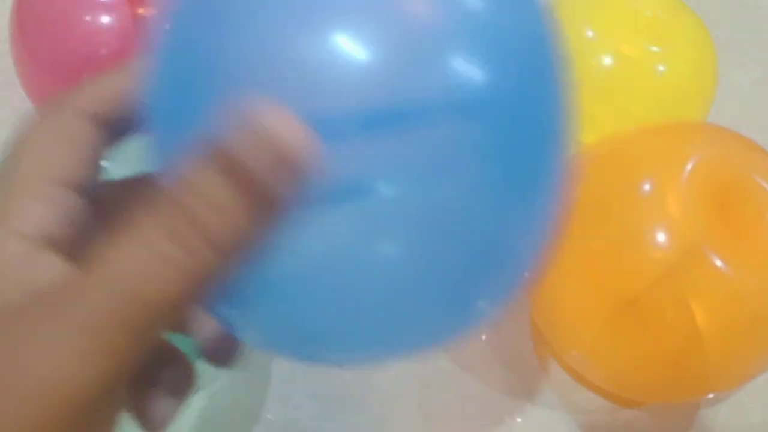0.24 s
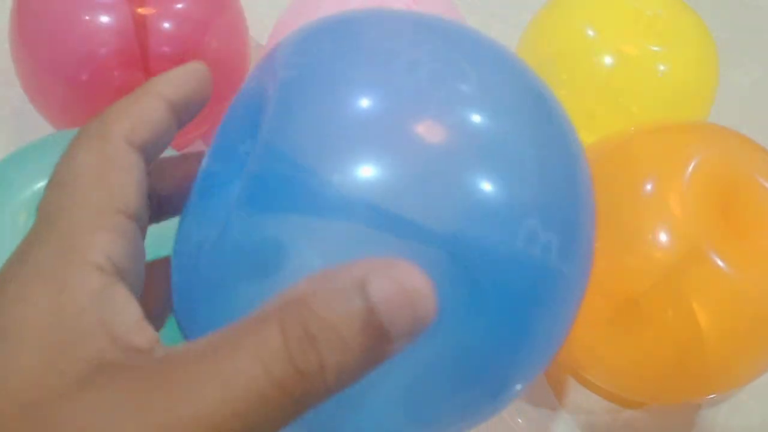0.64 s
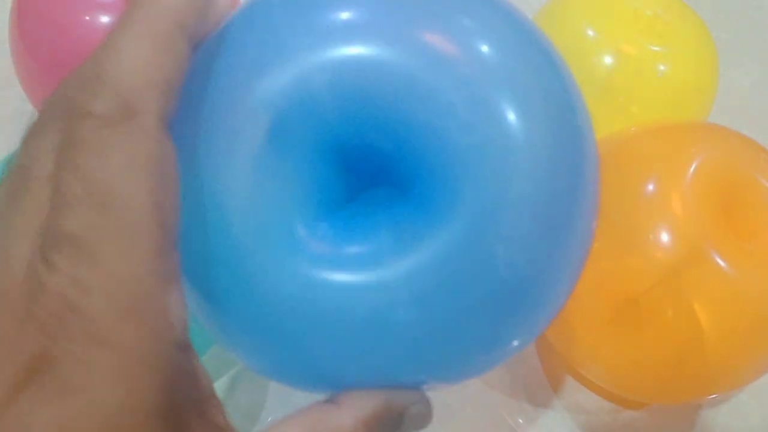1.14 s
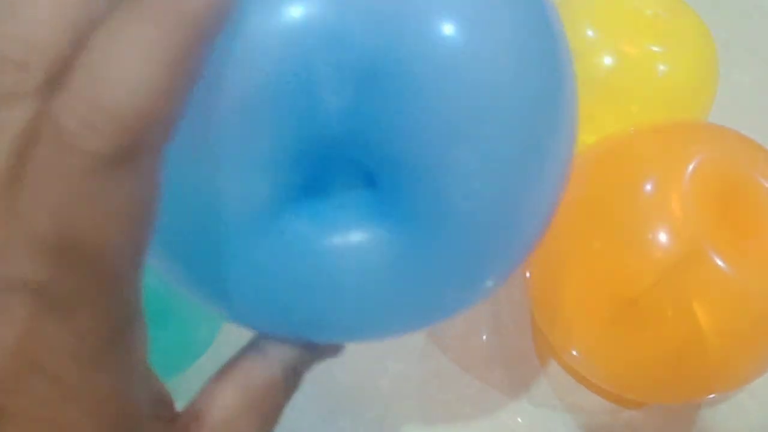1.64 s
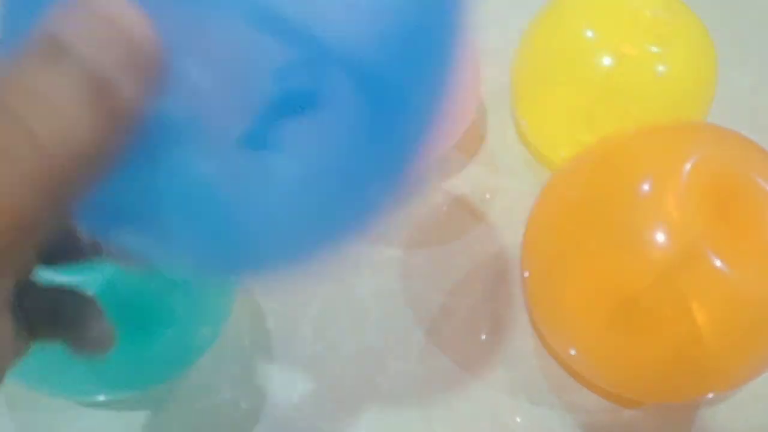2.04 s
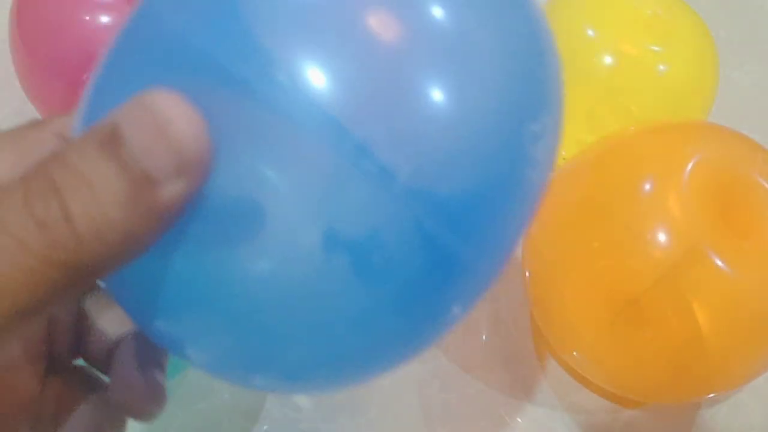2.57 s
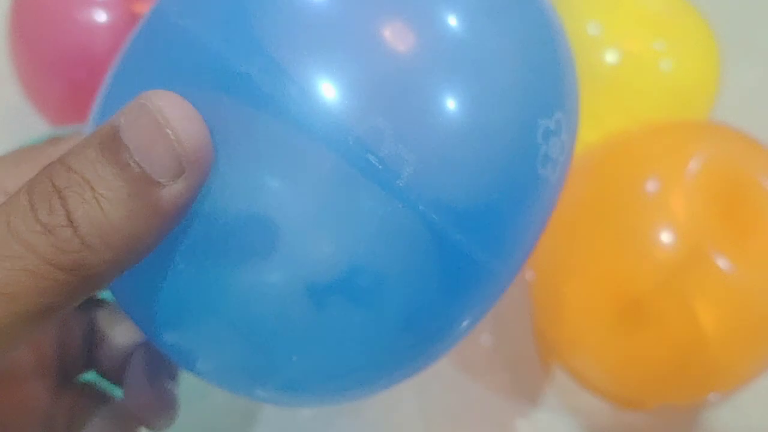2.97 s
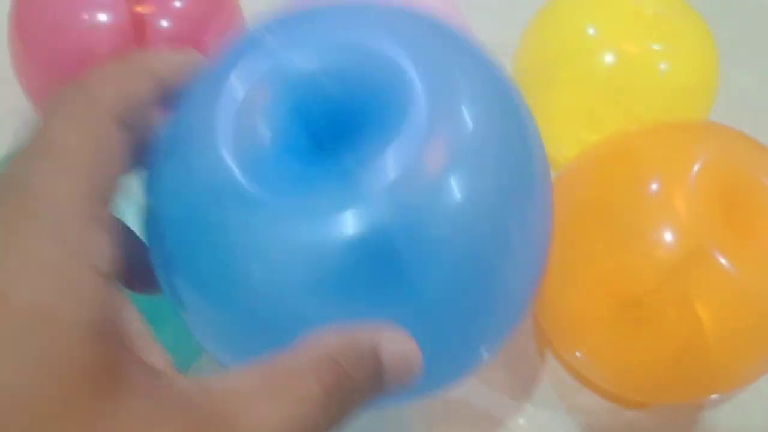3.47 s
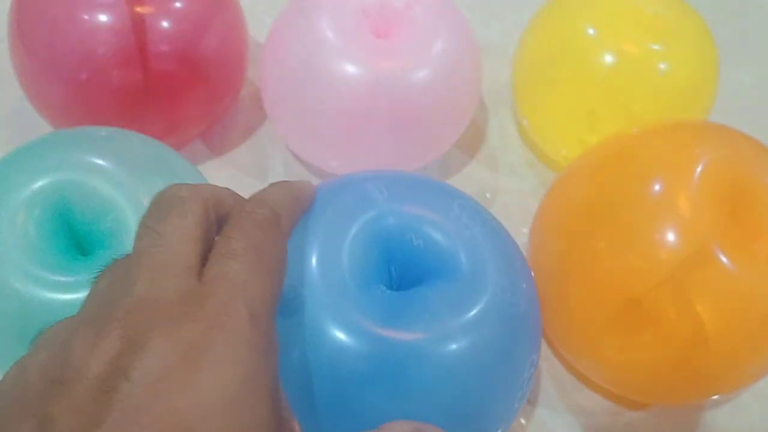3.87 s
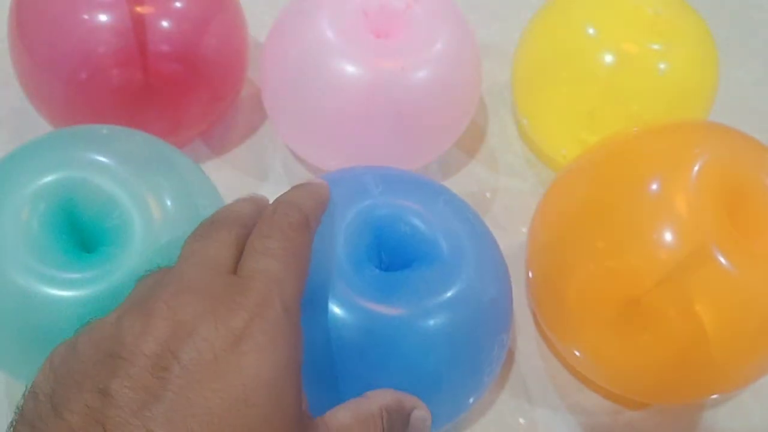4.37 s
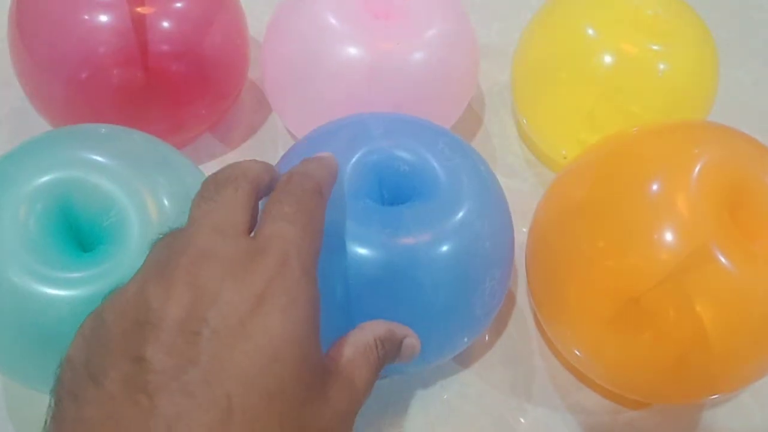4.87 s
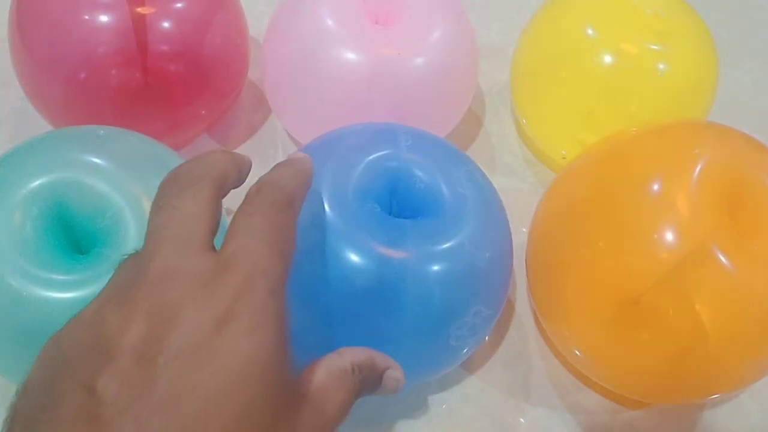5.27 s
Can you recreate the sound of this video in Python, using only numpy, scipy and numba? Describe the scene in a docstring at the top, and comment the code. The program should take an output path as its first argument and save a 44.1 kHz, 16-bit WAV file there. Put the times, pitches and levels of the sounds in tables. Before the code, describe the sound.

A hand turns and squeezes an inflated rubber balloon, with hollow ringing taps, soft rubbing and short creaks in a small room.

```python
"""In a small, hard-walled room, a hand turns and squeezes a blown-up rubber balloon close by,
then presses it down on a table among others. Fingertips pat the tight skin, fingers slide with
a soft rustle, and the rubber grips and slips in short creaks. Every touch makes the skin and
the air inside ring. The room adds a faint echo and a quiet hum."""
import sys
import numpy as np
from scipy import signal
from scipy.fft import rfft, irfft, next_fast_len
from scipy.io import wavfile
from numba import njit

SR = 44100
rng = np.random.default_rng(int(sys.argv[2]) if len(sys.argv) > 2 else 0)


def wav_out(sig):
    """Save sig, one row per channel (or a flat mono array), as 16-bit PCM at SR to the path in sys.argv[1]."""
    wavfile.write(sys.argv[1], SR, np.round(np.clip(np.atleast_2d(sig).T, -1, 1) * 32767).astype(np.int16))


N = 242991
RING_SIZE = 8192  # samples allowed for one ring to die away
AGE = np.arange(RING_SIZE) / SR  # seconds since a kick


def undb(db):
    """Turn decibels into a number to multiply by."""
    return 10 ** (np.asarray(db) / 20)


def level(x, db, seconds):
    """Scale x so that what both ears share has an average (rms) level of db over its first seconds."""
    shared = np.atleast_2d(x).mean(0)[:int(seconds * SR)]
    return x * undb(db) / np.sqrt(np.mean(shared ** 2))


def decay(t60):
    """A fade that falls 60 dB in t60 seconds, the 'fade time'."""
    return np.exp(-np.log(1000) * AGE / t60)


def colour(x, points):
    """Make some pitches louder and others softer, along a curve of (Hz, dB) points."""
    size = next_fast_len(x.shape[-1] + RING_SIZE // 2, True) * 2
    hz, db = np.transpose(points)
    grid = np.maximum(np.arange(size // 2 + 1) * SR / size, 1)
    gain = undb(np.interp(np.log(grid), np.log(hz), db))
    cepstrum = irfft(np.log(gain))
    # fold the filter so that it never sounds before it is struck
    cepstrum[1:size // 2] *= 2
    cepstrum[size // 2 + 1:] = 0
    return irfft(rfft(x, size) * np.exp(rfft(cepstrum)), size)[..., :x.shape[-1]]


def stereo_noise(size, width):
    """Noise for two ears; more width makes them less alike."""
    mid, side = rng.standard_normal((2, size))
    return np.array([mid + width * side, mid - width * side]) / np.hypot(1, width)


def play(force, response):
    """Every kick in the force sets off its own copy of a stereo response."""
    return signal.fftconvolve(force[None], response, axes=1)[:, :len(force)]


def blend(first, second, db, seconds):
    """Mix two sounds, the second one db louder than the first."""
    return level(first, 0, seconds) + level(second, db, seconds)


def add(out, start_s, sound, pan_db):
    """Mix a sound into out, with the left ear pan_db louder than the right."""
    start = max(int(start_s * SR), 0)
    sound = sound[:, :N - start]
    out[:, start:start + sound.shape[1]] += sound * undb([[pan_db / 2], [-pan_db / 2]])


# the tone of the room's background noise: (pitch [Hz], relative level [dB])
HUSH_COLOUR = [(12, -53.5), (20, -4), (60, -8.5), (130, -20.5), (459, -25), (499, -25), (923, -28),
               (2390, -32.5), (2600, -31), (3950, -37.5), (4810, -42.5), (5230, -36), (16000, -45.5)]
# steady humming notes: (pitch [Hz], level [dB])
HUM_NOTES = [(495, -85.5), (1558, -90.5)]
def room_hush(noise_db=-75.5):
    """A faint rumble, hiss and hum fill the room the whole time."""
    hum = sum(undb(db) * np.sin(2 * np.pi * hz * np.arange(N) / SR) for hz, db in HUM_NOTES)
    noise = colour(stereo_noise(N, 0.9), HUSH_COLOUR)
    return level(noise, noise_db, N / SR) + hum


def ringing(notes, detune, width):
    """Fading notes; the grip shifts their pitch, the spot touched their strength and direction."""
    hz, db, t60 = np.transpose(notes)
    tune, strength, lean = rng.standard_normal((3, len(hz)))
    phase = 2 * np.pi * (hz * (1 + detune * tune))[:, None] * AGE
    fade = undb(db + 2 * strength)[:, None] * decay(t60[:, None])
    lean = min(width, 1) * np.tanh(lean)[:, None]
    return np.array([(fade * np.sin(phase + ear * lean)).sum(0) for ear in (1, -1)])


def ripples(force, points, t60, direct, width):
    """Each kick is heard directly, then as ripples that criss-cross the skin and die away."""
    fade = decay(t60) ** 2
    energy = np.abs(play(force ** 2, fade[None] / fade.sum()))
    scattered = np.sqrt(energy) * stereo_noise(len(force), min(width, 1))
    return colour(direct * force + scattered, points)


# notes of the 'belly' (the skin bending broadly) and of the air inside, low and high:
# (pitch [Hz], relative level [dB], fade time [s])
BELLY_NOTES = [(182.5, -6, 0.012), (240, 6, 0.14), (284.3, 7.5, 0.13), (316.2, 1.5, 0.13),
               (444.5, -4, 0.093)]
LOW_AIR_NOTES = [(537, -4, 0.032), (624.4, -6, 0.27), (665.6, -1, 0.12), (787, -6, 0.11), (935, 1.5, 0.031),
                 (1020, -18, 0.062), (1134, -2.5, 0.1)]
HIGH_AIR_NOTES = [(1237, 6, 0.045), (1307, 4.5, 0.14), (1513, 0.5, 0.1), (1830, -6.5, 0.15),
                  (1978, 0.5, 0.11), (2175, -8, 0.16), (2390, -15, 0.068), (3060, -6, 0.053)]
# the tone of the skin's mellow ripples, bright slap and thin tick: (pitch [Hz], relative level [dB])
SKIN_COLOUR = [(200, -50), (400, -15.5), (600, 10), (1100, -3), (1500, -6), (3000, -52)]
SLAP_COLOUR = [(500, -62), (900, -4), (1300, -1), (2000, -6), (3200, -13.5), (4300, -25.5), (7000, -54.5)]
TICK_COLOUR = [(2500, -25), (4400, -14.5), (5500, -4), (7300, 0.5), (8600, -7), (10500, -22),
               (15500, -28.5)]
def balloon(force, seconds, ring_hz, ripple_db, belly_db, slap_db, tick_db,
            ring_t60, slap_t60, tick_t60, direct, low_air_db, high_air_db, detune):
    """A touch sounds four parts: the belly, the ring of the touched patch, a slap and a tick."""
    belly = play(force, ringing(BELLY_NOTES, detune=2 * detune, width=.5))
    belly = colour(belly, [(70, -14.0), (190, -6.5), (450, -4.5), (1200, -13.5)])
    patch = play(force, np.sin(2 * np.pi * ring_hz * AGE) * decay(ring_t60) * np.ones((2, 1)))
    # one patch answers every kick alike, which gives a creak its overtones
    skin = ripples(signal.unit_impulse(RING_SIZE), SKIN_COLOUR, t60=0.089, direct=0.57, width=0.099)
    ring = blend(patch, play(force, skin), ripple_db, seconds)
    low_air = play(force, ringing(LOW_AIR_NOTES, detune=detune, width=0.52))
    ring = blend(ring, low_air, low_air_db, seconds)
    ring = colour(ring, [(150, -35), (450, 4), (1200, 3.5), (4000, -10.5)])
    slap = ripples(force, SLAP_COLOUR, slap_t60, direct, width=0.68)
    high_air = play(force, ringing(HIGH_AIR_NOTES, detune=detune / 2, width=0.2))
    slap = blend(slap, high_air, high_air_db, seconds)
    tick = ripples(force, TICK_COLOUR, tick_t60, direct, width=1.0)
    parts = (belly, belly_db), (ring, 0), (slap, slap_db), (tick, tick_db)
    return sum(level(part, db, seconds) for part, db in parts)


# notes of the wobbling balloon: (pitch [times the main pitch], relative level [dB], fade time [s])
WOBBLE_NOTES = [(.5, -18.5, 0.15), (.84, -8.5, 0.23), (1, 5, 0.095), (1.5, -5, 0.024)]
def wobble(main_hz=92.6):
    """The whole balloon shakes in the hand with a low thud."""
    notes = [(multiple * main_hz, db, t60) for multiple, db, t60 in WOBBLE_NOTES]
    thud = ringing(notes, detune=.01, width=0.79)
    return colour(thud, [(25, -17), (60, 0.0), (170, 11), (600, -28)])


# fingertip pats and snaps; a heavier finger gives more wobble, a harder one more slap:
# (time [s], ring level [dB], ring pitch [Hz], wobble [dB above the ring], slap [dB above the ring])
PATS = [(0.0145, -51, 720, 3, -10), (0.0392, -46.5, 550, 8.5, -10), (0.073, -54, 650, 12, -4),
        (0.124, -45, 865, -2, -15.5), (0.1735, -49.5, 784, 6.5, -9), (0.187, -39, 548, -6, -15.5),
        (0.203, -47, 695, 5.5, -5.5), (0.2485, -41, 590, 10.5, -6.5), (0.311, -49, 586, 3, -8),
        (0.3981, -44.5, 650, 11.5, -10.5), (0.474, -47.5, 670, 14, -12.5), (0.552, -48, 870, 0, -15),
        (0.5648, -44, 715, 0, -12), (0.622, -61, 600, 14, -7), (0.6953, -44.5, 656, -6.5, -30.5),
        (0.7178, -42, 640, -12.5, -27.5), (0.8063, -44, 690, -12, -23), (0.846, -32.5, 618, -20, -26.5),
        (0.8597, -33, 653, -17.5, -30), (1.034, -43, 640, -12, -14), (1.312, -59, 696, 4, -19),
        (1.3403, -44, 576, -12.5, 2.5), (1.4709, -49.5, 756, -5.5, -12.5), (1.597, -49.5, 660, 5.5, -11),
        (1.6646, -57, 557, 8, -10.5), (1.7106, -44.5, 680, -2, -24), (2.175, -47, 540, 8, -16),
        (2.2, -51.5, 636, 3, -14), (2.2335, -54.5, 680, 17, -14), (2.2694, -48, 630, 6.5, -13.5),
        (2.303, -58, 604, 17, -16.5), (2.3733, -40.5, 620, 9, -6.5), (2.4423, -42, 800, -6.5, -10.5),
        (2.4868, -45.5, 624, 8.5, -13), (2.537, -38, 430, 7.5, -31.5), (2.5939, -43, 627, 13.5, -10.5),
        (2.6918, -47.5, 800, 3, -12), (2.74, -58, 595, 7.5, -18), (2.7656, -54.5, 630, -6, -19),
        (2.788, -62, 620, 7.5, -18), (3.1787, -73, 730, -3, 0), (3.2717, -53.5, 620, -31, -17.5),
        (3.569, -54.5, 720, -21.5, -22), (3.577, -43, 631, -25, -13.5), (4.4524, -42.5, 813, -27, -12.5),
        (4.9989, -52, 649, -15.5, -14), (5.0728, -54.5, 740, -16.5, 2)]
def pats(onset_s=.025):
    """A fingertip lands: the balloon wobbles, the skin rings and the finger skids for a moment."""
    out = np.zeros((2, N))
    kick = signal.unit_impulse(RING_SIZE)
    for start_s, ring_db, ring_hz, wobble_db, slap_db in PATS:
        ripple_db = 6 + 0.21 * wobble_db + .3 * slap_db
        belly_db = 0.5 + 0.47 * wobble_db + 0.027 * slap_db
        tick_db = -12.5 + .03 * wobble_db + 0.96 * slap_db
        pan_db = -2.6 - 0.1 * wobble_db + .01 * slap_db
        # a firm pat that shakes the whole balloon skids longer than a light snap
        skid = np.interp(wobble_db, [-12, 0], [.3, 1])
        skin = balloon(kick, onset_s, ring_hz, ripple_db, belly_db, slap_db, tick_db,
                       ring_t60=.04, slap_t60=0.081 * skid, tick_t60=.085 * skid,
                       direct=0.17 / skid, low_air_db=-18.5, high_air_db=-7.5, detune=0.018)
        thud = level(wobble(), wobble_db, onset_s)
        add(out, start_s, undb(ring_db) * (skin + thud), pan_db)
    return out


@njit
def moving_band(x, hz, width):
    """Keep only the sound near a moving pitch; width is a share of that pitch."""
    out, band, low = np.empty(len(x)), 0., 0.
    for i in range(len(x)):
        step = np.tan(np.pi * hz[i] / SR)
        passed = (band + step * (x[i] - low)) / (1 + step * (step + width))
        band = 2 * passed - band
        low += 2 * step * passed
        out[i] = width * passed
    return out


# strokes of a finger over the skin: (time [s], length [s], level [dB], ring pitch [Hz])
STROKES = [(0.053, 0.052, -50.5, 249), (0.213, 0.08, -54, 510), (0.387, 0.12, -51.5, 370.6),
           (0.656, 0.025, -48.5, 580), (0.76, 0.14, -53, 434), (0.996, 0.083, -55.5, 510),
           (1.117, 0.027, -48.5, 527), (1.206, 0.1, -70.5, 504), (1.318, 0.16, -51.5, 642),
           (1.58, 0.034, -52.5, 437), (1.687, 0.036, -51, 484), (1.75, 0.17, -72.5, 443),
           (1.94, 0.093, -49, 408), (2.16, 0.18, -69.5, 380), (2.419, 0.16, -50.5, 371),
           (2.587, 0.16, -62, 494), (3.221, 0.033, -64, 770), (3.651, 0.16, -61.5, 726),
           (4.168, 0.023, -50, 910), (4.31, 0.07, -56, 774), (4.421, 0.026, -51.5, 790),
           (4.548, 0.027, -50, 778), (4.794, 0.14, -54.5, 904), (5.054, 0.05, -59, 720),
           (5.183, 0.018, -67.5, 790)]
def strokes(rise_db_per_s=421, fall_db_per_s=268):
    """Each stroke rises, holds and fades; gives the level and the rubbed patch's pitch over time."""
    t = np.arange(N) / SR
    start_s, length, db, hz = np.transpose(STROKES)[:, :, None]
    before, after = np.maximum(start_s - t, 0), np.maximum(t - start_s - length, 0)
    power = undb(db - rise_db_per_s * before - fall_db_per_s * after) ** 2
    total = power.sum(0)
    return 10 * np.log10(total), (power * hz).sum(0) / total


# the tone of a sliding finger's hiss: (pitch [Hz], relative level [dB])
HISS_COLOUR = [(600, -16.5), (1400, 7), (2200, -1.5), (3300, -8), (4400, -22), (5600, -13), (7500, -12.5),
               (10500, -36.5), (15500, -41.5)]
def sliding(slips_per_s=800, scatter_db=3):
    """Fingers creep over the rubber in countless tiny slips, and the whole balloon sways."""
    slide_db, ring_hz = strokes()
    seconds = N / SR
    slipped = rng.random(N) < slips_per_s / SR
    force = slipped * undb(scatter_db * np.minimum(rng.exponential(size=N), 4))
    patch = level(moving_band(moving_band(force, ring_hz, 0.8), ring_hz, 0.8), 0, seconds)
    air = level(play(force, ringing(LOW_AIR_NOTES, detune=0.0014, width=.25)), -7, seconds)
    belly = level(play(force, ringing(BELLY_NOTES[1:], detune=0.0076, width=0.47)), -8, seconds)
    sway = colour(stereo_noise(N, 0.8), [(15, -23.5), (35, 4.5), (85, 2.5), (130, -0.5), (300, -45)])
    sway = level(sway, -9, seconds)
    # a slack, low-pitched patch passes more of its motion to the belly and less to the air
    slack = 500 / ring_hz
    body = patch + air / slack + belly * slack ** 2
    body = colour(body, [(80, -9.5), (230, 4.5), (1200, -7.5), (4000, -11.5)])
    # a tight, high-pitched patch hisses more
    hiss_db = -15.5 + 13 * np.log2(ring_hz / 500)
    hiss = level(ripples(force, HISS_COLOUR, t60=0.028, direct=0.86, width=1.0), 0, seconds)
    return undb(slide_db) * (body + slack * sway + undb(hiss_db) * hiss)


def slips(length, first_hz, last_hz, uneven, swell_db, max_slips=64):
    """The rubber sticks, stretches and lets go again and again, at a gliding rate."""
    force, now = np.zeros(int(length * SR) + 1), 0
    for wait, strength_db in rng.standard_normal((max_slips, 2)):
        if now >= length:
            break
        progress = now / length
        period = 1 / (first_hz + (last_hz - first_hz) * progress)
        # the finger moves steadily, so a late slip does not hold up the next one
        late = abs(uneven * wait) * min(period, now)
        force[int(min(now + late, length) * SR)] = undb(swell_db * progress + strength_db)
        now += period
    force[0] *= np.sqrt(2)  # breaking loose from rest takes the most force
    return force


# creaks of gripping rubber: (time [s], length [s], first slip rate [Hz], last slip rate [Hz],
# unevenness [0-1], swell [dB], ring level [dB], ring pitch [Hz],
# belly [dB above the ring], slap [dB above the ring])
CREAKS = [(0.825, 0.014, 691, 905, 0.03, 8.5, -66.5, 900, 5, 11.5),
          (0.866, 0.027, 195, 261, 0.27, 7.5, -36, 571, -6.5, -27),
          (0.896, 0.027, 309.4, 321, 0.21, -6, -41.5, 598, -2, -16.5),
          (1.109, 0.044, 159.7, 192.2, 0.2, 3, -47, 678, 0, -13),
          (1.424, 0.021, 412.6, 425, 0.02, 3, -41, 844, -13, -12.5),
          (1.722, 0.012, 204, 263, 0.17, -9, -46, 692, -8, -35),
          (3.577, 0.031, 318.3, 249.5, 0.16, -9, -35, 700, -12.5, -6),
          (3.761, 0.023, 151.4, 210.8, 0.2, 5, -44, 723, -13.5, -9),
          (4.0051, 0.027, 125.5, 145.8, 0.09, 0, -29.5, 682, -12.5, -7.5),
          (4.051, 0.035, 125.1, 336, 0.17, -5, -31.5, 670, -8, -7.5),
          (4.1136, 0.041, 207.6, 318.5, 0.1, -4.5, -35.5, 687, -17, -7),
          (4.2492, 0.033, 177, 335, 0.07, 0, -47.5, 744, -8.5, -0.5),
          (4.6663, 0.03, 129.9, 148, 0.05, 4.5, -42, 976, -6, 1),
          (4.701, 0.048, 274.4, 280, 0.11, -0.5, -42, 1010, -2.5, 2.5),
          (4.753, 0.034, 209.6, 191.5, 0.15, 1, -44.5, 998, -7.5, 1.5)]
def creaks():
    """A quick run of slips kicks the same patch of skin, and the kicks blur into a creak."""
    out = np.zeros((2, N))
    for start_s, length, *slip_settings, ring_db, ring_hz, belly_db, slap_db in CREAKS:
        # a harder slip stirs more ripples and ticks more
        ripple_db = 1.4 + .5 * slap_db
        tick_db = -16 + 0.74 * slap_db
        force = np.pad(slips(length, *slip_settings), (0, RING_SIZE))
        skin = balloon(force, length, ring_hz, ripple_db, belly_db, slap_db, tick_db,
                       ring_t60=0.062, slap_t60=.012, tick_t60=.014,
                       direct=1.4, low_air_db=-3, high_air_db=-4, detune=.003)
        add(out, start_s, undb(ring_db) * skin, pan_db=-0.5)
    return out


def room_echo(x, early_t60=0.11, late_t60=0.92, gap_s=.012):
    """Sound bounces quickly off the table and near walls, then leaves a faint long tail."""
    age = np.arange(SR) / SR
    fades = (np.exp(-np.log(1000) * age / t60) for t60 in (early_t60, late_t60))
    tails = (stereo_noise(SR, 0.76) * fade for fade in fades)
    early, late = (tail / np.sqrt(np.sum(tail ** 2) / 2) for tail in tails)
    early = colour(early, [(80, 9.5), (500, 2.2), (1500, 0.44), (8000, 6.5), (14000, 3.5)])
    late = colour(late, [(80, 6.0), (300, -3.5), (700, -8.5), (2500, 5.5), (6000, 5.5), (12000, -2.5)])
    echo = np.pad(undb(-15) * early + undb(-22) * late, ((0, 0), (int(gap_s * SR), 0)))
    return signal.fftconvolve(x, echo, axes=1)[:, :N]


def scene():
    """The handled balloon, its echo and the quiet room behind them."""
    touches = pats() + creaks() + sliding()
    return touches + room_echo(touches) + room_hush()


def record(dry, lag_samples=4, top_hz=15800):
    """The sound reaches the left microphone a little later, and the highest treble is cut."""
    left = np.pad(dry[0], (lag_samples, 0))[:N]
    treble_cut = signal.ellip(8, .2, 70, top_hz, fs=SR, output="sos")
    return signal.sosfilt(treble_cut, np.array([left, dry[1]]))


dry = scene()
out = record(dry)
wav_out(out)
```